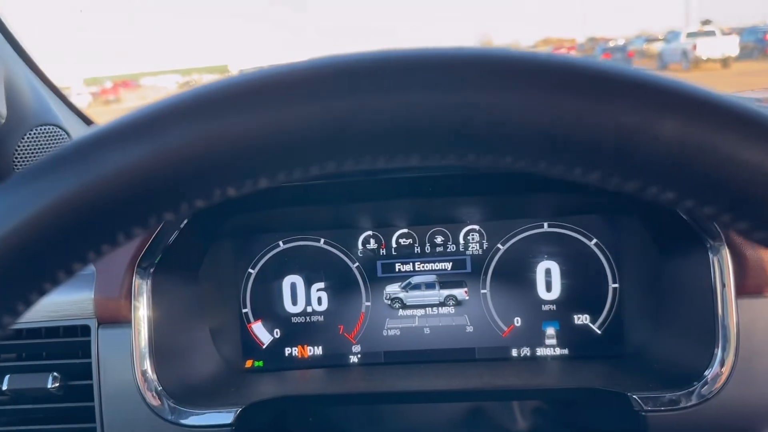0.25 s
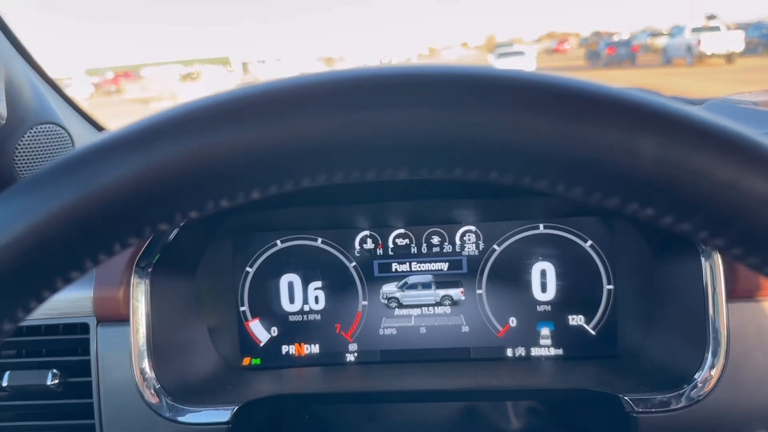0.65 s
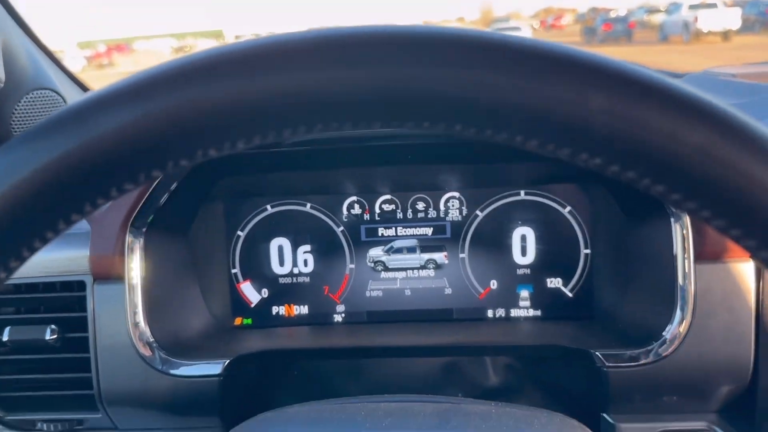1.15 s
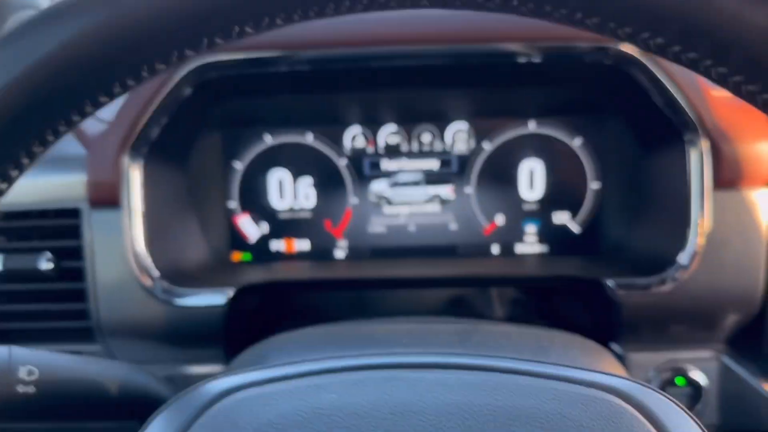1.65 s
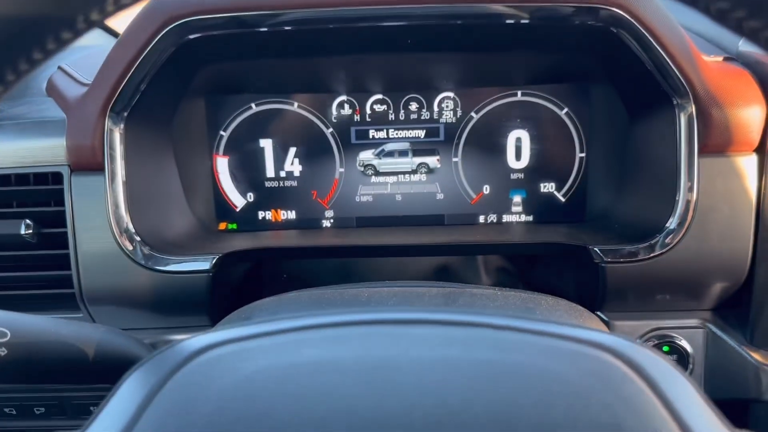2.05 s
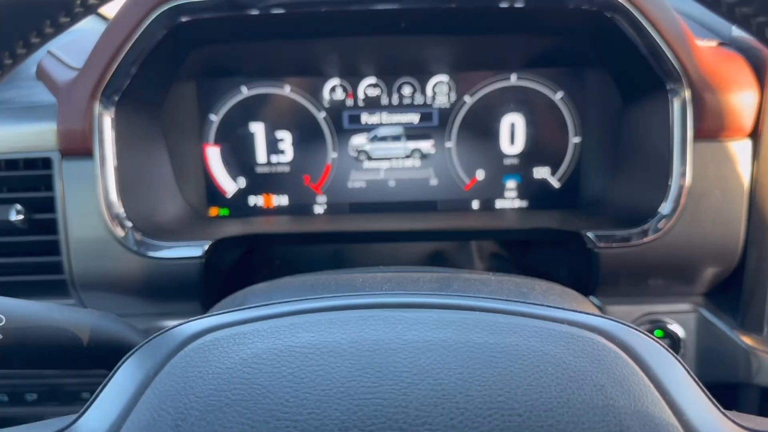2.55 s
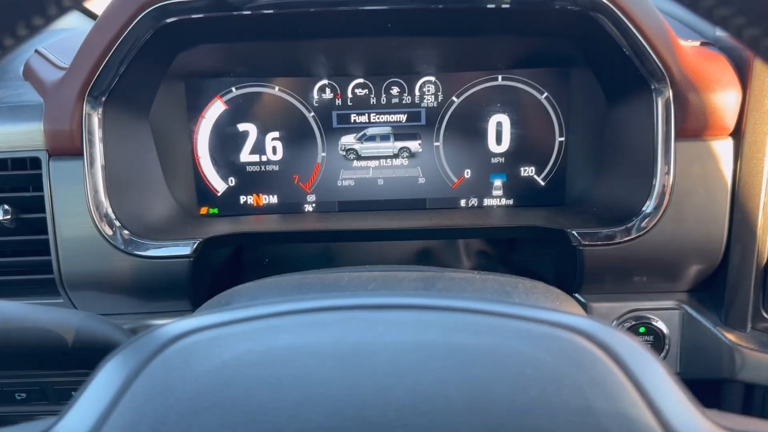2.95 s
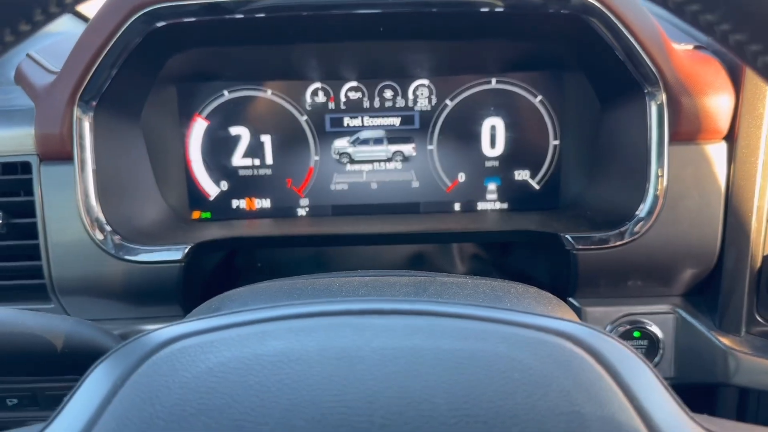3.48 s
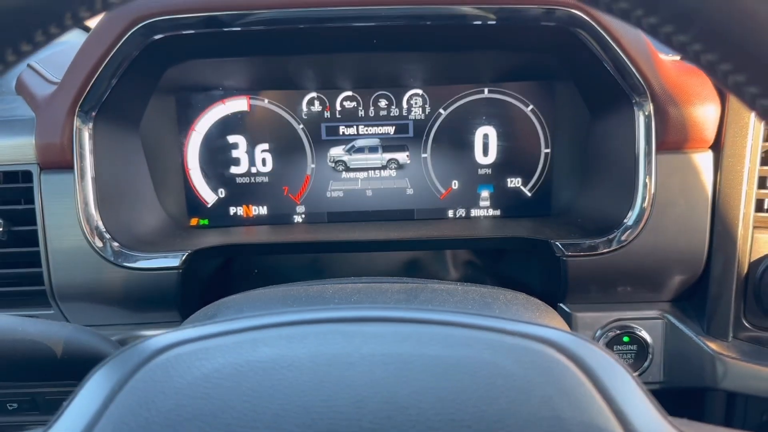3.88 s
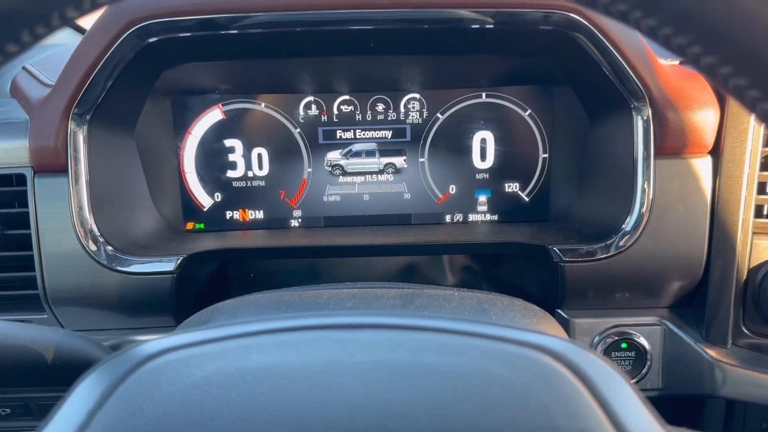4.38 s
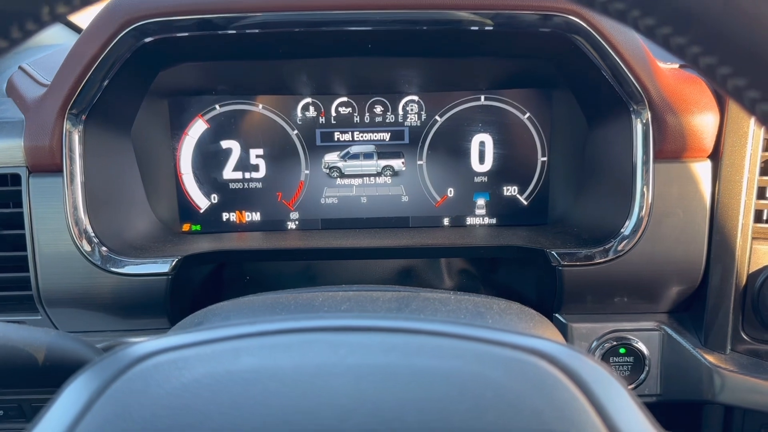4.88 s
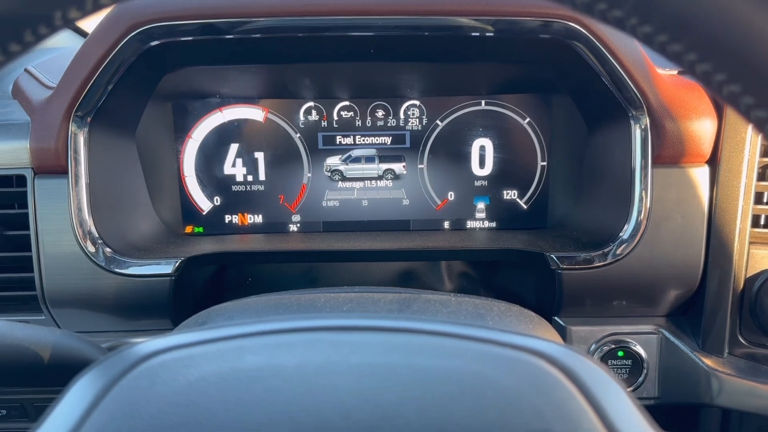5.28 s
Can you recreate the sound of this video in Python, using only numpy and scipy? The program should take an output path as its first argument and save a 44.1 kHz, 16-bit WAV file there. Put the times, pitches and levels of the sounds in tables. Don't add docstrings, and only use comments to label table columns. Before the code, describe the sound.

Heard from the seat of a small closed truck cab through a handheld stereo phone. From 0 to 1.4 s the engine idles very low and soft under a faint hush; cloth rustles until about 0.7 s, a tick falls at the start and a dull knock near 0.6 s, and a faint far whine wavers and falls around 0.9-1.3 s. At 1.4 s the pedal is stabbed: a deep throaty boom swells, then sinks by 2.2 s. A dry snap at 2.4 s comes amid a stronger second rev, rising until 2.7 s and easing. The third, from 3.2 s, climbs higher, peaks around 3.6 s with a sharp tick at 3.5 s, then coasts slowly down. Ticks at 4.5 s precede the fourth, highest rev, uneven and growling, peaking near 5.1 s with bassy thumps and a lighter follow-up. Panels ring, engine-bay air roars and belts whirr brighter; it ends still loud, pitch falling.

```python
import sys
import numpy as np
from scipy import signal
from scipy.fft import rfft, irfft, next_fast_len
from scipy.io import wavfile
from scipy.ndimage import uniform_filter1d

SR = 44100
rng = np.random.default_rng(int(sys.argv[2]) if len(sys.argv) > 2 else 0)


def transcribe(u):
    v = np.clip(np.atleast_2d(u).T, -1, 1)
    q = np.round(v * 32767).astype(np.int16)
    wavfile.write(sys.argv[1], SR, q)


def boost_factor(decibels):
    exponent = np.asarray(decibels, float) / 20
    return 10 ** exponent


N = 243873

# time_s, bank_firing_rate_hz, boom_db
SPEED = [(0.0, 15.9, -45), (1.37, 15.9, -35), (1.57, 27.1, -9), (1.77, 38.4, -12.5), (1.92, 33.6, -18.5),
         (2.11, 29, -34.5), (2.26, 25.8, -28.5), (2.45, 45.4, -17.5), (2.66, 65.8, -7), (3.24, 52.2, -13),
         (3.37, 64.3, -10.5), (3.56, 88, -11.5), (3.7, 87.9, -8.5), (4.62, 61.4, -9), (4.96, 96.4, -8),
         (5.07, 98.6, -7.5), (5.3, 97, -11.5), (5.53, 82, -6.5)]
# press_s, lift_s, depth_0_to_1
PEDAL = [
    (1.424, 1.808, 0.65),
    (2.33, 2.735, 0.86),
    (3.2, 3.689, 0.86),
    (4.592, 5.095, .9),
    (5.1, 5.6, .3),
]
# over_boom_db, over_load_db, at_idle_db
MULTIPLES = [(1.44, -39, -69), (-0.63, 2.5, -54.5), (-8, -0.2, -35.5), (-7.5, -0.5, -34.5)]
# thirds_of_bank_rate, level_db
THIRDS = [(2, -22), (4, -3), (5, 2), (7, -6), (8, -5.5), (10, -4), (11, -2.5), (13, -10), (14, -5),
          (16, -3), (17, -4), (19, -1), (20, -8.5), (22, -4), (23, -8), (25, -2), (26, -5.5), (28, -5.5),
          (29, -4.5)]
# middle_s, depth_db, half_width_s
STUMBLES = [
    (2.548, -8.5, .08),
    (2.77, -10, .04),
    (2.1, -5, .06),
    (5.2, -5, .04),
    (3.29, -15.5, 0.057),
    (3.681, -12.5, 0.03),
    (4.241, -3.5, 0.075),
    (4.644, -10.5, .05),
    (4.8, -6, 0.1),
    (5.131, -11, 0.058),
]
# frequency_hz, gain_db
EXHAUST_PIPE = [(30, -18.5), (58, 13.5), (80, 11), (100, 8.5), (125, 4.5), (170, -3), (230, -10.5),
                (300, -11.5), (400, -19.5), (700, -28.5), (1200, -33), (2000, -66.5)]
# pitch_hz, width_hz, level_db
PANELS = [(269.2, 8.5, -10.5), (443, 13, -13), (501.9, 9.9, -10.5), (556.5, 15, -12), (617.5, 8.2, -22),
          (840.5, 17, -18.5), (1123, 19, -21), (1280, 30, -29), (1860, 45, -37)]
# frequency_hz, gain_db
CAB_AIR = [(16, -43), (32, -31), (40, -25), (47, -9.5), (55, 0.5), (98, -5.5), (120, -16.5), (200, -28)]
# frequency_hz, gain_db
FLOOR_PATH = [(60, 4.5), (125, 4.5), (160, 1.5), (185, -9), (205, 0.5), (230, -7.5), (265, 2.14),
              (340, -24.5)]
# frequency_hz, density_db_per_hz
ROAR = [(100, -24.5), (170, -7.5), (280, -22), (380, -24.5), (540, -24.5), (650, -28.5), (840, -23),
        (960, -29), (1100, -23.5), (1350, -25.5), (1530, -26), (1800, -34.5), (2600, -53.5), (5000, -62.5),
        (9000, -100)]
# frequency_hz, density_db_per_hz
RUSTLE = [(900, -26), (1800, -1.5), (2300, 0), (3300, -7.5), (5500, -9), (8300, -16), (9800, -17.5),
          (10500, -49), (12000, -54.5), (13000, -23.5), (15600, -24.5)]
# middle_s, half_hold_s, level_db, fall_db_per_s
RUSTLE_MOVES = [(0.347, 0.38, -57.5, 250), (1.366, .015, -65, 250), (1.58, .015, -64, 200),
                (1.625, .005, -68.5, 300), (1.732, 0.0026, -71.5, 60), (2.25, .01, -61.5, 153),
                (2.545, .008, -60, 400), (2.59, .012, -62, 400), (2.74, 0.0079, -68.5, 147.5),
                (3.182, 0.023, -61.5, 253), (3.506, 0.037, -59, 112), (3.522, 0.0034, -54.5, 501),
                (4.504, 0.0044, -60, 401), (4.908, 0.32, -67, 27), (5.031, .01, -62.5, 70),
                (5.051, .003, -49.5, 599)]
# frequency_hz, density_db_per_hz
HUSH = [(1500, -24), (2500, 0), (4750, -11), (9300, -25.5), (10200, -53), (12000, -57), (14000, -37),
        (15600, -41)]
# frequency_hz, density_db_per_hz
WHIRR = [(1200, -28), (1900, -1), (2500, 1.5), (3100, -13.5), (5000, -25), (9000, -39.5)]
# start_s, crack_db, low_knock_db, ring_hz, left_right_db
TICKS = [(0.05, -32.5, -44, 621.6, 15.5), (0.591, -44, -31, 740, -2), (0.719, -57, -51.5, 1500, -4),
         (1.587, -58, -42, 1250, 2), (1.7246, -53.5, -47, 1320, -4), (2.537, -60, -50.5, 900, 0),
         (2.5886, -56, -45, 890, -5), (2.7245, -55.5, -41.5, 856.5, -2.5), (3.156, -54.5, -55, 697.6, -3.5),
         (3.475, -49, -45.5, 903, 1), (3.516, -26.5, -39.5, 896, -4.7), (4.4844, -35.5, -43, 1565, -10),
         (4.4922, -37, -35, 884, -4), (5.055, -37.5, -37.5, 814, -2.5), (5.193, -63, -41, 903, -3)]
# frequency_hz, density_db_per_hz
CRACK = [(1000, -29), (1700, -3.5), (2800, -3), (5000, -4.5), (8500, -10), (10000, -27), (16000, -42.5)]
# time_s, pitch_hz, level_db
WHINE = [
    [(0.91, 555, -88), (0.916, 540, -62), (0.936, 564, -50), (0.98, 503, -62)],
    [(1.06, 512, -65), (1.096, 571, -51), (1.236, 514, -60), (1.274, 480, -53.5), (1.31, 483, -82)],
]
# start_s, peak_db, pitch_hz, t60_s
BOOMS = [
    (1.44, -12, 50.1, 0.39),
    (2.021, -24, 49.2, 0.44),
    (2.317, -2.5, 64.3, 0.24),
    (2.75, -9, 51.43, 0.18),
    (3.681, 2, 59.2, 0.13),
    (4.95, -20, 61.7, 0.24),
    (5.121, -7.5, 61.7, 0.34),
    (5.196, -5.5, 70.1, 0.25),
]
# frequency_hz, side_mid_db
PORTS_APART = [(40, -36), (95, -30), (170, -11), (350, -3), (700, -2), (1400, -2), (2800, -4), (5500, -4),
               (9500, -5), (14000, -12)]
# frequency_hz, left_right_db
PORTS_LEAN = [(60, .2), (170, 2.4), (350, -1), (700, 0), (1400, -4.5), (2800, 0), (5500, 2.5), (10000, .5)]
# frequency_hz, gain_db
MIC_GAP = [(9700, 0), (10100, -25), (12200, -25), (12600, 0)]

IDLE_HZ = 14
COARSE = 8


def evened(x):
    return x / np.sqrt(np.mean(x ** 2) + 1e-20)


def read(points, hz):
    f, value = np.transpose(points)
    return np.interp(np.log(hz + 1), np.log(f + 1), value)


def columns(rows):
    s, *rest = np.transpose(rows)
    return [np.interp(np.arange(N) / SR, s, c) for c in rest]


def colour(x, points):
    size = next_fast_len(N + SR)
    gain = boost_factor(read(points, np.fft.rfftfreq(size, 1 / SR)))
    return irfft(rfft(x, size) * gain, size)[..., :N]


def resonate(x, hz, width):
    return signal.lfilter(*signal.iirpeak(hz, hz / width, SR), x)


def add(mix, s, sound):
    part = mix[..., round(s * SR):][..., :sound.shape[-1]]
    part += sound[..., :part.shape[-1]]


def wander(per_s, size=1):
    knots = rng.standard_normal(400)
    return np.interp(np.arange(0, N, size) / SR * per_s, np.arange(len(knots)), knots)


def quarter(x):
    size = next_fast_len(N)
    return irfft(-1j * rfft(x, size), size)[:N]


def reflected(x, t60):
    t = np.arange(SR // 5) / SR
    tail = rng.standard_normal(len(t)) * boost_factor(-60 * t / t60)
    return signal.fftconvolve(x, tail / np.linalg.norm(tail))[:N]


def spread(mid, side):
    side = colour(side, PORTS_APART)
    return np.array([mid + side, mid - side])


def pedal():
    t = np.arange(N) / SR
    bite, lag_s = 0.64, 0.017
    down = np.zeros(N)
    for press, lift, depth in PEDAL:
        build = bite + (1 - bite) * (t - press) / (lift - press)
        down += depth * ((t > press) & (t < lift)) * build
    return uniform_filter1d(down, int(lag_s * SR))


def controls():
    (hz, boom_db), down, t = columns(SPEED), pedal(), np.arange(N) / SR
    idle = np.clip(1 - (hz - IDLE_HZ) / 10, 0, 1)
    load_db = -56.5 + 0.1591 * hz + 13.5 * down
    stumble_db = sum(db * np.maximum(1 - abs(t - s) / half, 0) for s, db, half in STUMBLES)
    boom_db = boom_db - 2.5 * down + stumble_db
    merging_db = -0.75 * np.maximum(hz - 38, 0)
    lines = []
    for k, (free_db, over_db, idle_db) in enumerate(MULTIPLES):
        line_hz = (k + 1) * hz
        exhaust = boost_factor(boom_db + free_db + (k > 0) * merging_db + read(CAB_AIR, line_hz))
        load = boost_factor(load_db + over_db + read(FLOOR_PATH, line_hz) + 2 * wander(10))
        lines.append(exhaust + load + idle * boost_factor(idle_db))
    uneven_db = 3 - 6.5 * idle
    buffet_db = -39 + 4 * idle + 3.5 * wander(5.3)
    return hz, lines, load_db, uneven_db, buffet_db


def through_cab(hz):
    grid = np.arange(1., 3000.)
    peaks = sum(boost_factor(db) / np.sqrt(1 + (2 * (grid - f) / w) ** 4) for f, w, db in PANELS)
    return np.interp(hz, grid, boost_factor(read(EXHAUST_PIPE, grid)) + peaks)


def engine():
    hz, lines, load_db, uneven_db, buffet_db = controls()
    start_turn = .46
    turns = start_turn + np.cumsum(hz * (1 + 0.0068 * wander(30))) / SR
    strength = boost_factor(2.7 * wander(23))
    boom = np.zeros(N)
    for k, line in enumerate(lines):
        boom += line * boost_factor(wander(20)) * np.cos(2 * np.pi * (k + 1) * turns)

    rate, crank = hz[::COARSE], turns[::COARSE]
    upper, thirds = np.zeros((2, len(rate)))
    lag = .14
    for k in range(5, 20):
        level = through_cab(k * rate) * boost_factor(3.1 * wander(9.8, size=COARSE))
        upper += level * np.cos(2 * np.pi * k * crank - lag * (k - 4) ** 2)
    for k, db in THIRDS:
        level = through_cab(k * rate / 3) * boost_factor(db + 3.0 * wander(14, size=COARSE))
        thirds += level * np.cos(2 * np.pi * (k * crank / 3 + rng.random()))
    upper, thirds = signal.resample_poly([upper, thirds], COARSE, 1, axis=1)[:, :N]

    puffs = rng.standard_normal(N) * (0.2 + np.exp(-(2 * turns % 1) / 0.24))
    panels = sum(boost_factor(db) * evened(resonate(resonate(puffs, f, w), f, 2 * w)) for f, w, db in PANELS)
    growl = evened(colour(puffs, EXHAUST_PIPE))
    buffet = evened(resonate(resonate(rng.standard_normal(N), 63, 35), 63, 35))
    loaded = strength * upper * boost_factor(-4.5) + boost_factor(uneven_db + 1) * thirds
    loaded = loaded + boost_factor(-8.0) * panels + boost_factor(-17 + hz / 5) * growl
    return np.sqrt(2) * boom + boost_factor(load_db) * loaded + boost_factor(buffet_db - 4.5) * buffet


def cab(x):
    return spread(x, .5 * reflected(x, 0.17) - .85 * quarter(x))


def air_levels():
    hz, t = columns(SPEED)[0], np.arange(N) / SR
    awake = np.clip((hz - IDLE_HZ) / (30 - IDLE_HZ), 0, 1)
    roar_db = -60.5 + 4 * awake + (0.0314 + 0.0903 * pedal()) * hz
    moves = sum(boost_factor(db - fall * np.maximum(abs(t - s) - hold, 0)) for s, hold, db, fall in RUSTLE_MOVES)
    still = boost_factor(-75 + 0.0191 * hz)
    return roar_db, moves + still


def air():
    roar_db, moves = air_levels()
    roar, rustle, hush = rng.standard_normal((3, 2, N))
    grains = boost_factor(2.5 * np.minimum(rng.exponential(1, N), 4)) * (rng.random(N) < 500 / SR)
    rustle = rustle * (1 + .45 * signal.lfilter([1], [1, -.985], grains))
    mix = evened(colour(roar, ROAR)) * boost_factor(roar_db + 5.5 + .5 * wander(40))
    mix = mix + evened(colour(rustle, RUSTLE)) * moves * boost_factor(-4.5 + 0.5 * wander(60))
    mid, other = mix + evened(colour(hush, HUSH)) * boost_factor(-75.5)
    mid = .87 * mid + .5 * reflected(mid, .2)
    return spread(mid, .6 * other + .8 * quarter(mid))


def whirr():
    speed = uniform_filter1d(columns(SPEED)[0], SR // 4, origin=SR // 10)
    noise = evened(colour(rng.standard_normal((2, N)), WHIRR))
    return spread(*(noise * boost_factor(-91.0 + 0.27 * speed)))


def ticks():
    out, t = np.zeros((2, N)), np.arange(3000) / SR
    knock_t60, crack_t60 = 0.077, 0.041
    dull = signal.butter(4, 2050, fs=SR, output="sos")
    cracks = evened(colour(rng.standard_normal(N), CRACK))
    cracks = cracks[:len(TICKS) * len(t)].reshape(-1, len(t))
    blows = rng.standard_normal(cracks.shape)
    for (s, db, knock_db, hz, pan_db), crack, blow in zip(TICKS, cracks, blows):
        blow = blow * boost_factor(-60 * t / knock_t60) * (1 - np.exp(-t / .001))
        knock = resonate(blow, hz, 160) + .35 * resonate(blow, 900, 1200) + .5 * resonate(blow, 400, 200)
        knock = signal.sosfilt(dull, knock)
        knock = boost_factor(knock_db + 4) * knock / abs(knock).max()
        crack = crack * boost_factor(db - 12 - 60 * t / crack_t60) * (1 - np.exp(-t / .002))
        add(out, s, (crack + knock) * boost_factor([[pan_db / 2], [-pan_db / 2]]))
    snap_s, snap_db = 2.4395, -43
    snap_band = signal.butter(3, [3300, 9500], "band", fs=SR, output="sos")
    snap = signal.sosfilt(snap_band, np.arange(200) == 0)
    add(out, snap_s, boost_factor(snap_db) * snap / snap.max())
    return out


def whine():
    out = np.zeros(N)
    for note in WHINE:
        (start, first_hz, _), (end, last_hz, _) = note[0], note[-1]
        hz, db = columns([(start - .02, first_hz, -95), *note, (end + .02, last_hz, -95)])
        out += boost_factor(db - 0.5) * np.sin(2 * np.pi * np.cumsum(hz) / SR)
    return out * boost_factor([[-2.5], [2.]])


def booms():
    out, t = np.zeros(N), np.arange(SR // 2) / SR
    swell = (1 - np.exp(-t / .01)) ** 2
    for s, db, hz, t60 in BOOMS:
        add(out, s, boost_factor(db - 60 * t / t60) * swell * np.sin(2 * np.pi * hz * t))
    return out


def scene():
    return cab(engine() + booms()) + air() + whirr() + ticks() + whine()


def top_cut(x):
    return signal.sosfilt(signal.butter(12, 15710, fs=SR, output="sos"), x)


def record(dry):
    f, db = np.transpose(PORTS_LEAN)
    left = colour(dry[0], np.transpose([f, db / 2]))
    right = colour(dry[1], np.transpose([f, -db / 2]))
    leaned = np.array([left, right])
    clock = np.cos(2 * np.pi * 9600 * np.arange(N) / SR)
    leak = boost_factor(-65.5) * leaned.mean(0) * clock
    return top_cut(colour(leaned, MIC_GAP) + leak)


dry = scene()
out = record(dry)
transcribe(out)
```